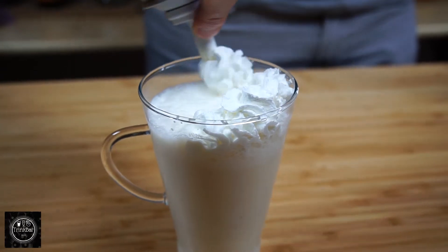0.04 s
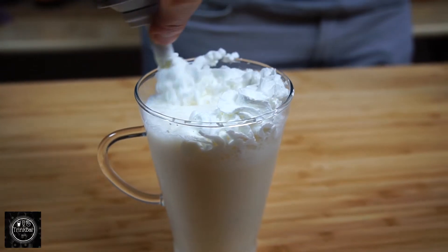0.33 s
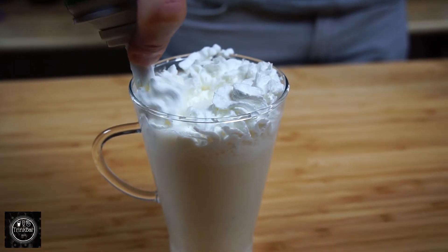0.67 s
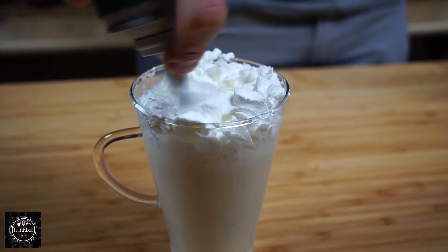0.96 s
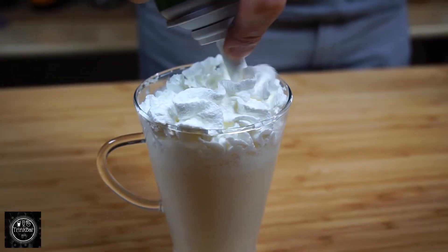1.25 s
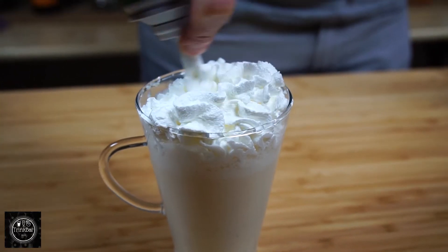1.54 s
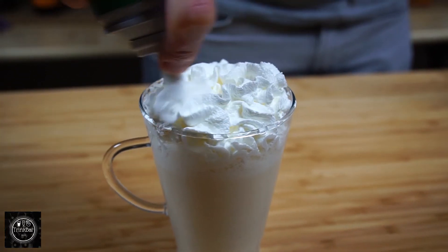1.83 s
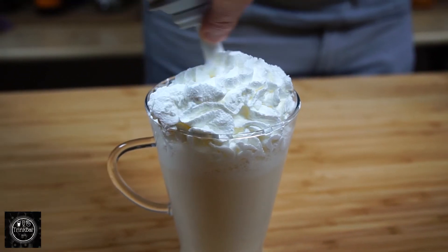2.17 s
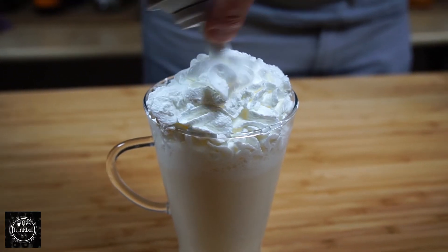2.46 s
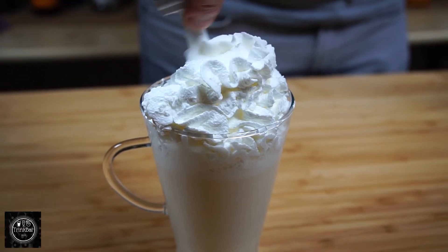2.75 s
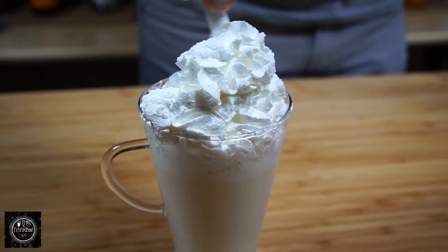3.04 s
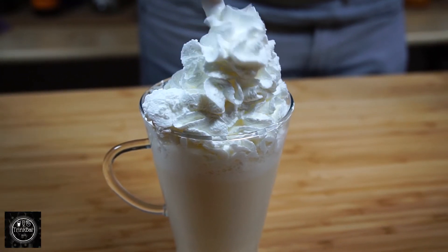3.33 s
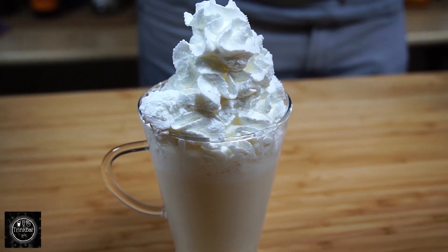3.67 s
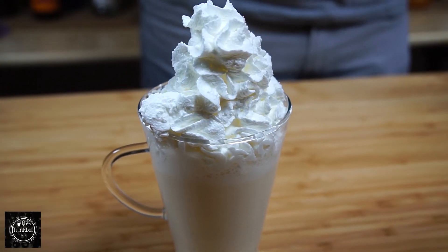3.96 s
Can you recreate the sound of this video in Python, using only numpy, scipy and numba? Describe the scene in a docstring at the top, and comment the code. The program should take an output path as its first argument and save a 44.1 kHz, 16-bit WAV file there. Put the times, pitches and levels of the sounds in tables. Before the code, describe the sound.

Whipped cream spraying from a pressurised dispenser with a fizzy hiss, ending in a sputter.

```python
"""Whipped cream sprayed onto a drink

Cream leaves a pressurised dispenser in a small kitchen. Gas pockets burst at the nozzle and excite
cavity resonances in the cream, over the steady fizz of escaping gas. At the end the gas breaks through,
spits a few times and the valve shuts; the room reverberates briefly over a low rumble."""
import sys
import numpy as np
from scipy import signal
from scipy.fft import rfft, irfft
from scipy.io import wavfile
from numba import njit

SR = 44100
rng = np.random.default_rng(int(sys.argv[2]) if len(sys.argv) > 2 else 0)


def persist_wave(psi):
    """Save psi, clipped to +-1, as 16-bit WAV."""
    counts = np.round(np.clip(psi, -1, 1) * 32767).astype(np.int16)
    wavfile.write(sys.argv[1], SR, np.atleast_2d(counts).T)


N = 176400
TIME = np.arange(N) / SR
SIDE = np.array([[1], [-1]])  # opposite signs for left and right


def undb(db):
    """Amplitude ratio of a level in decibels."""
    return 10 ** (np.asarray(db) / 20)


def unit(x):
    """Normalisation to rms 1."""
    return x / np.sqrt(np.mean(x ** 2))


def curve(rows, axis=1):
    """Linear interpolation of one table column over time."""
    rows = np.array(rows)
    return np.interp(TIME, rows[:, 0], rows[:, axis])


def across(rows, size, axis=1):
    """Interpolation of one table column onto spectral bins, over log frequency."""
    rows = np.array(rows)
    hz = np.arange(size // 2 + 1) * SR / size
    return np.interp(np.log(hz + 1), np.log(rows[:, 0]), rows[:, axis])


def colour(x, rows, size=8192):
    """Minimum-phase filtering at unit energy: the (Hz, dB) rows set only the spectral shape."""
    cepstrum = irfft(np.log(undb(across(rows, size))))
    cepstrum[1:size // 2] *= 2
    cepstrum[size // 2 + 1:] = 0
    response = irfft(np.exp(rfft(cepstrum)))
    return signal.oaconvolve(x, response / np.linalg.norm(response))[:N]


@njit
def bandpass(x, hz, width_hz):
    """A second-order state-variable resonator with a moving centre."""
    y = np.empty(len(x))
    band_state, low_state = 0., 0.
    for i in range(len(x)):
        g = np.tan(np.pi * hz[i] / SR)
        damping = width_hz / hz[i]
        band = (band_state + g * (x[i] - low_state)) / (1 + g * (g + damping))
        band_state = 2 * band - band_state
        low_state += 2 * g * band
        y[i] = damping * band
    return y


def ring(x, hz, width_hz):
    """Forced response of a resonator, at rms 1."""
    return unit(bandpass(x + 1e-18, hz * np.ones(N), float(width_hz)))


def noise():
    """Gaussian white noise."""
    return rng.standard_normal(N)


def wander(points):
    """Band-limited fluctuation at rms 1, through random points spaced over the scene."""
    return unit(signal.resample(rng.standard_normal(points), N))


def pops(per_s, spread_db, evenness=2.5, count=40000):
    """A renewal process of impulses with capped log-normal sizes; evenness 1 is Poisson timing."""
    gaps = np.maximum(1 + (rng.exponential(1, count) - 1) / np.sqrt(evenness), 0)
    at = np.cumsum(gaps * SR / per_s).astype(int)
    sizes = undb(spread_db * np.minimum(rng.standard_normal(count), 2)) * rng.choice([-1, 1], count)
    return unit(np.bincount(at[at < N], sizes[at < N], N))


def impulses(rows):
    """Impulsive excitation: one pulse for each (seconds, dB) row."""
    at, db = np.array(rows).T
    return np.bincount((at * SR).astype(int), undb(db), N)


def ambience(rows, side_db):
    """Partly coherent stereo noise, the sum and difference of independent mid and side signals."""
    return colour(noise(), rows) + undb(side_db) * colour(noise(), rows) * SIDE


# Spectrum of the room tone. Each row: frequency in Hz, relative level in dB.
ROOM_TONE = [(70, -7), (110, -2.5), (200, -3), (290, -9.5), (400, -10.5), (1400, -16), (3500, -16),
             (15000, -18)]

def room_tone():
    """Stationary broadband noise forms the noise floor of the room."""
    return undb(-62.5) * ambience(ROOM_TONE, side_db=-0.5)


# Spectrum of the rumble. Each row: frequency in Hz, relative level in dB.
RUMBLE = [(10, -7.5), (25, -0.5), (36, -3.5), (44, 1.5), (54, -5), (70, -27), (110, -19.5), (250, -63)]
# Its brief swell. Each row: time in seconds, gain in dB.
RUMBLE_SWELL = [(0.52, 1), (0.57, 10), (0.64, 9), (0.69, -1)]

def rumble(pan_db=4):
    """Low-frequency noise swells once; an interaural level difference places it to the left."""
    return undb(-60.5) * ambience(RUMBLE, side_db=-1) * undb(curve(RUMBLE_SWELL) + pan_db / 2 * SIDE)


# Reverberation of the kitchen. Each row: band centre in Hz, reverberation time in seconds,
# gain in dB, side relative to mid in dB.
REVERB_BANDS = [(202, 0.93, -15, -17), (600, 0.39, -6.5, -3.5), (1410, 0.38, -4, -14),
                (2780, 0.33, -2.5, -8), (5900, 0.4, -12, -4), (12100, 0.24, -8, 0.5)]

def reflections(size, first_echo_s=0.0043, early_db=9, early_t60_s=0.06):
    """Transfer function of a diffuse field: early echoes off counter and cupboards, then a longer decay."""
    t = np.arange(size) / SR
    centres = np.array(REVERB_BANDS)[:, 0]
    diffuse = rfft(rng.standard_normal((2, size)))
    early = undb(early_db - 60 * t / early_t60_s)
    tail = 0
    for share, (_, t60, wet_db, side_db) in zip(np.eye(len(centres)), REVERB_BANDS):
        fade = (undb(-60 * t / t60) + early) * (t > first_echo_s)
        band = irfft(diffuse * across(np.c_[centres, share], size))
        mid, side = band * fade / np.linalg.norm(fade)
        tail = tail + undb(wet_db) * (mid + undb(side_db) * side * SIDE)
    return rfft(tail)


# Interaural level difference. Each row: frequency in Hz, left minus right in dB.
BALANCE = [(200, .8), (1200, 1), (2200, 0), (5000, -0.2), (7500, -1), (9500, 0.2), (11500, 3.5),
           (13000, -1.5), (15500, -1)]
# Interaural phase of the direct sound. Each row: frequency in Hz, lead of the left ear in radians.
PHASE_LEAD = [(200, -0.22), (5500, 0.14), (8500, -1.4), (11000, 0.34), (15500, -1.2)]

def kitchen(x, size=32768, patterns=4, margin=64):
    """Multipath propagation: direct sound plus reflection patterns that shift as the nozzle moves."""
    balance = undb(across(BALANCE, size) / 2)
    lead = np.exp(1j * across(PHASE_LEAD, size) / 2)
    shares = np.array([wander(points=160) for _ in range(patterns)])
    shares /= np.linalg.norm(shares, axis=0)  # constant total power
    paths = [(x, np.array([lead, 1 / lead]))] + [(x * share, reflections(size)) for share in shares]
    out = 0
    for sound, path in paths:
        # the margin keeps the samples that precede time zero
        response = np.roll(irfft(path * np.array([balance, 1 / balance])), margin, axis=1)
        out = out + signal.fftconvolve(sound[None], response, axes=1)[:, margin:margin + N]
    return out


# The nozzle's thin top hiss and two whistles. Each row: time in seconds, level in dB, centre in Hz.
TOP_HISS = [(0.0, -50.5, 11150), (0.3, -46, 10900), (0.55, -48.5, 10900), (0.8, -48, 11080),
            (1.05, -49.5, 10700), (1.35, -45.5, 10750), (1.55, -44.5, 10900), (1.7, -48, 10750),
            (1.83, -49, 11000), (2.05, -47.5, 11000), (2.3, -47.5, 10600), (2.72, -45, 10870),
            (3.0, -46.5, 10700), (3.2, -47, 10900)]
LOW_WHISTLE = [(0.0, -50, 6500), (0.17, -54.5, 6600), (0.4, -57, 6550), (0.65, -52, 6680), (0.9, -54, 6600),
               (1.2, -55, 6600), (1.45, -48.5, 6530), (1.75, -50.5, 6570), (1.98, -51, 6600),
               (2.1, -53, 6700), (2.21, -44, 6400), (2.33, -54, 6470), (2.6, -48, 6430), (2.78, -53, 6600),
               (2.87, -58, 6550), (3.03, -47, 6430), (3.2, -52, 6530)]
HIGH_WHISTLE = [(0.1, -53, 8600), (0.4, -56, 8500), (1.0, -58, 8850), (1.2, -58, 9000), (1.45, -61, 8900),
                (1.6, -52, 9000), (1.83, -52, 8800), (2.08, -55, 8950), (2.22, -46.5, 9080),
                (2.38, -49, 8850), (2.5, -45, 8740), (2.65, -50, 8900), (2.8, -52, 8950), (2.95, -50, 8800),
                (3.05, -47.5, 8600)]

def nozzle():
    """Noise-driven resonances give a hiss and two airy whistles that slide as the nozzle circles."""
    centre = curve(TOP_HISS, axis=2) * (1 + 0.006 * wander(points=24))
    hiss = ring(noise(), centre, width_hz=1600)
    out = ring(hiss, centre, width_hz=1600) * undb(curve(TOP_HISS) - 0.44)  # twice, for steeper skirts
    for track, width_hz in ((LOW_WHISTLE, 180), (HIGH_WHISTLE, 280)):
        out = out + ring(noise(), curve(track, axis=2), width_hz) * undb(curve(track))
    return out


# Envelope of the gas flow, shared by fizz, jet and thumps. Each row: time in seconds, level in dB.
FLOW = [(0.0, -38.5), (0.44, -39.5), (0.46, -38), (1.06, -39.5), (1.07, -37), (1.71, -38.5), (1.77, -39.5),
        (1.79, -34), (1.9, -37.5), (2.29, -37), (3.17, -37.5), (3.2, -38)]
# Spectrum of the fizz. Each row: frequency in Hz, relative level in dB.
FIZZ = [(1500, -14.5), (3000, 4.5), (4000, 0.5), (4700, 2), (5600, -1), (6100, -2.5), (7100, 0.5),
        (8000, 0.5), (9700, -1), (12000, -1), (14000, -0.5), (15800, -5)]
# Small cavities in the foam. Each row: mean resonance in Hz, mean level against the fizz in dB.
FOAM = [(4100, -17), (4700, -20), (5400, -20), (7250, -19), (12200, -20)]

def fizz(bursts):
    """Broadband flow noise: gas hisses, tiny bubbles crackle, bursts snap and foam cavities resonate."""
    hiss = undb(-4) * noise()
    crackle = undb(-7) * pops(per_s=1500, spread_db=7)
    snaps = undb(-11.5) * bursts
    out = colour(hiss + crackle + snaps, FIZZ)
    for hz, db in FOAM:
        cavity = ring(noise(), hz * (1 + 0.017 * wander(points=14)), width_hz=520)
        out = out + cavity * undb(db + 5 * wander(points=22))
    return out * undb(curve(FLOW))


# Spectrum of the jet's side signal. Each row: frequency in Hz, relative level in dB.
JET_WIDTH = [(1500, -20), (3500, -23), (5500, 5), (8000, -3), (11000, 8), (13500, 7), (15800, -3)]

def jet_width():
    """Interaural decorrelation: the spreading jet hisses a little differently into each ear."""
    return colour(noise(), JET_WIDTH) * undb(curve(FLOW) - 9.5) * SIDE


# Large single bubbles. Each row: start in seconds, strength in dB, pitch in Hz.
BUBBLES = [(0.172, -12, 1410), (0.247, -18, 1500), (0.686, -19, 1540), (0.699, -18, 1480),
           (0.742, -14, 1370), (0.757, -14, 1430), (0.771, -7, 1320), (0.91, -5.5, 1180), (1.004, -7, 1820),
           (1.043, -14, 1420), (1.092, -8, 1480), (1.133, -14.5, 1380), (1.193, -11.5, 1200),
           (1.401, -11, 1190), (1.668, -3.5, 1600), (1.989, -5, 2330), (2, -21, 1590), (2.014, -18, 1870),
           (2.093, -12, 3570), (2.272, -5.5, 2800), (2.309, -3.5, 2220), (2.329, -8, 2600),
           (2.455, -8, 1380), (2.465, -7, 1490), (2.82, -7.5, 1260), (3.248, -5, 1080), (3.261, -10, 1300),
           (3.265, -4, 1220), (3.293, -7, 1180), (3.332, -4, 1150), (3.38, -9.5, 1340), (3.468, -26, 1610)]
# Spectrum of their snap. Each row: frequency in Hz, relative level in dB.
BUBBLE_SNAP = [(150, -28), (500, 2), (1100, -5.5), (2200, -8), (3500, 26), (7000, 17), (15000, -83)]

def bubbles(decay_cycles=2.7):
    """Damped oscillation: each large bubble snaps open and rings for a few cycles."""
    out = 0.35 * colour(impulses([row[:2] for row in BUBBLES]), BUBBLE_SNAP)
    for start, db, hz in BUBBLES:
        cycles = np.maximum(TIME - start, 0) * hz
        decay = np.exp(-np.minimum(cycles / decay_cycles, 20))
        out = out + undb(db - 16.5) * np.sin(2 * np.pi * cycles) * decay
    return out


# Envelope of the last gush. Each row: time in seconds, level in dB.
GUSH = [(3.16, -54), (3.22, -34), (3.245, -32.5), (3.255, -33.5), (3.31, -30.5), (3.35, -33), (3.385, -28),
        (3.391, -53.5), (3.415, -67)]
# Spits of gas through the cream. Each row: start in seconds, strength in dB.
SPITS = [(0.517, -11), (1.066, -14.5), (1.18, -23), (1.475, -15), (1.826, -13), (2.047, -13.5),
         (2.211, -27), (2.492, -14), (2.613, -14.5), (2.623, -15), (2.889, -12), (2.934, -10), (3.2335, -6),
         (3.2585, -6.5), (3.274, -13), (3.333, -6.5), (3.339, -2), (3.344, -2), (3.375, -12),
         (3.3815, -9.5), (3.3855, -7.5), (3.3875, -6.5), (3.409, -20), (3.468, -36), (3.492, -38),
         (3.572, -40)]
# Spectra of the escaping gas and of a spit's tick. Each row: frequency in Hz, relative level in dB.
GUSH_COLOUR = [(60, -30), (130, -14.5), (200, -0.5), (290, -2.5), (370, -3.5), (460, -10.5), (700, -2),
               (1000, -0.5), (1350, 0), (1780, -4.5), (2250, 3), (2550, -10), (3500, -4), (4400, -6.5),
               (5900, -8), (7200, -5), (9700, -8.5), (11000, -8), (14000, -14.5), (15800, -16)]
SPIT_TICK = [(3000, -41), (6500, -5), (9000, 8), (13000, 0), (15800, -2)]

def gush_and_spits(spit_decay_s=0.0014):
    """Sudden pressure release: gas spits with a tick and a short spray, and finally rushes through."""
    rush = unit(pops(per_s=750, spread_db=3) + undb(-2) * noise())
    at, db = np.array(GUSH).T
    envelope = undb(np.interp(TIME, at, db, left=-np.inf, right=-np.inf))
    spray = 0.25 * noise() * np.exp(-TIME / spit_decay_s)
    spray[0] = -1  # a sharp pulse leads each spray
    releases = undb(-2.5) * impulses(SPITS)
    spits = signal.fftconvolve(releases, spray)[:N]
    ticks = colour(-releases, SPIT_TICK)
    return colour(rush * envelope + spits, GUSH_COLOUR) + ticks


# Spectrum of a burst's thump. Each row: frequency in Hz, relative level in dB.
THUMP = [(60, -29.5), (120, -18), (180, 0), (235, -2.5), (285, 6), (330, -4.5), (385, -4), (460, -8.5),
         (700, -2.5), (1200, -36)]

def thumps(bursts):
    """The low-frequency response to the bursts, blended with noise, is a dull thumping."""
    return colour(bursts + 1.23 * noise(), THUMP) * undb(curve(FLOW) - 16.5)


# Three resonances around the nozzle. Each row: time in seconds, level in dB, centre in Hz.
LOW_RING = [(0.0, -43, 2360), (0.22, -38.5, 2310), (0.5, -42, 2190), (0.74, -40.5, 2170),
            (0.95, -45.5, 2150), (1.05, -42.5, 2300), (1.4, -41, 2360), (1.84, -39.5, 2260),
            (1.9, -48.5, 2280), (2.0, -35.5, 2310), (2.06, -46, 2280), (2.2, -37, 2250), (2.3, -37.5, 2210),
            (2.55, -40, 2300), (2.7, -41, 2240), (2.9, -35.5, 2280), (2.95, -43, 2230), (3.13, -43, 2200),
            (3.2, -36.5, 2140)]
MID_RING = [(0.0, -39, 2800), (0.22, -40.5, 2580), (0.34, -43, 2800), (0.42, -38.5, 2770),
            (0.6, -38.5, 2790), (0.77, -47, 2830), (0.92, -39, 2840), (1.2, -45, 2900), (1.45, -40.5, 2780),
            (1.62, -33, 2940), (1.92, -39, 2800), (2.17, -44, 2870), (2.3, -35, 2820), (2.56, -46.5, 2900),
            (2.9, -40, 2830), (3.2, -41, 2840)]
HIGH_RING = [(0.0, -55, 3700), (0.9, -60, 3840), (1.4, -59, 3680), (1.65, -49, 3570), (1.82, -51, 3620),
             (2.1, -56, 3600), (2.26, -46, 3640), (2.32, -40.5, 3580), (2.45, -42, 3640), (2.6, -43, 3710),
             (2.75, -53, 3460), (2.9, -43.5, 3520), (3.05, -44, 3560), (3.2, -50, 3385)]
# The same three, from low to high. Each row: bandwidth in Hz, added gain in dB.
RING_SHAPES = [(380, -2.5), (278, -7), (226, 1.55)]
# Spectrum of their excitation. Each row: frequency in Hz, relative level in dB.
RING_DRIVE = [(900, -28), (1750, -10.5), (2000, 2.5), (3000, 5.5), (3700, -7.5), (4300, -9.5), (7000, -27)]

def nozzle_rings(bursts, drift=0.0095):
    """Impulse excitation: the bursts ring three sliding resonances around the nozzle."""
    out = 0
    for (width_hz, db), track in zip(RING_SHAPES, (LOW_RING, MID_RING, HIGH_RING)):
        drive = colour(bursts * (1 + 0.19 * noise()), RING_DRIVE)
        centre = curve(track, axis=2) * (1 + drift * wander(points=60))
        out = out + ring(drive, centre, width_hz) * undb(curve(track) + db)
    return out


# Gurgle of the hollow in the cream. Each row: time in seconds, relative level in dB, resonance in Hz.
GURGLE = [(0.0, -33, 1400), (0.02, -37, 1430), (0.21, -35.5, 1270), (0.46, -36.5, 1490), (0.56, -36, 1290),
          (0.62, -33, 1520), (0.69, -31.5, 1580), (0.77, -32.5, 1420), (0.86, -34.5, 1290),
          (0.96, -39.5, 1080), (1.08, -35.5, 1360), (1.25, -39, 1200), (1.39, -36.5, 1180),
          (1.48, -40.5, 1090), (1.55, -38.5, 1500), (1.71, -34, 1500), (1.77, -40, 1350), (1.79, -37, 1270),
          (1.91, -41, 1120), (2.0, -36, 1320), (2.07, -42, 1280), (2.22, -40.5, 1260), (2.31, -35.5, 1400),
          (2.38, -38, 1400), (2.47, -31.5, 1260), (2.54, -40.5, 1220), (2.7, -39.5, 1210),
          (2.81, -38, 1220), (2.93, -38, 1080), (3.07, -42, 1180), (3.2, -42.5, 1180)]
# Steady colour of the hollow. Each row: frequency in Hz, relative level in dB.
HOLLOW = [(450, -24.5), (620, -9.5), (830, -3.5), (1030, 2), (1200, 0.5), (1620, -0.5), (1850, -6),
          (2300, -21), (4000, -27)]

def gurgle(bursts):
    """Cavity resonance: bursting gas pockets ring the shifting hollow in the cream."""
    hollow = ring(colour(bursts, HOLLOW), curve(GURGLE, axis=2), width_hz=695)
    return hollow * undb(curve(GURGLE) - 1.5)


def scene(shut_s=3.39, closing_s=0.021, flutter_db=0.8):
    """Superposition in the kitchen: one train of bursts drives cream and fizz until the valve shuts."""
    valve = np.clip((shut_s - TIME) / closing_s, 0, 1)
    bursts = pops(per_s=470, spread_db=4.5)
    cream = gurgle(bursts) + nozzle_rings(bursts) + thumps(bursts)
    gas = (fizz(bursts) + nozzle()) * undb(flutter_db * wander(points=300))
    spray = valve * (cream + gas) + gush_and_spits() + bubbles()
    return rumble() + kitchen(spray) + valve * jet_width() + room_tone()


def record(dry, cutoff_hz=15800):
    """Band limiting: a steep elliptic low-pass removes the highest treble."""
    return signal.sosfilt(signal.ellip(10, .1, 80, cutoff_hz, fs=SR, output="sos"), dry)


dry = scene()
out = record(dry)
persist_wave(out)
```